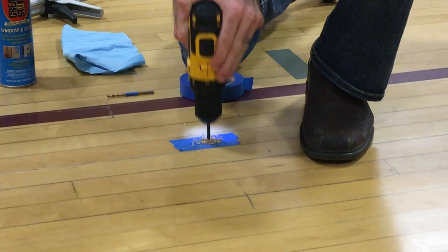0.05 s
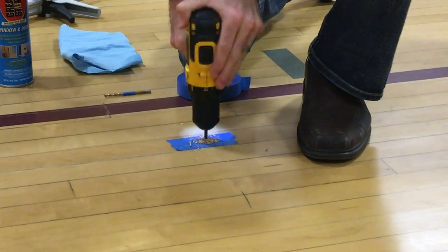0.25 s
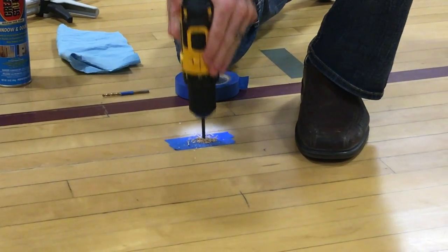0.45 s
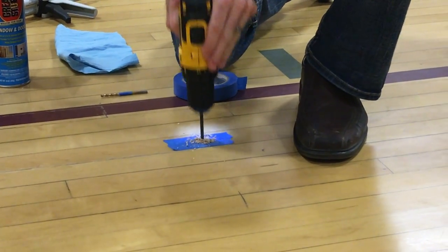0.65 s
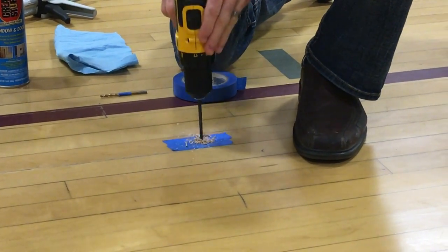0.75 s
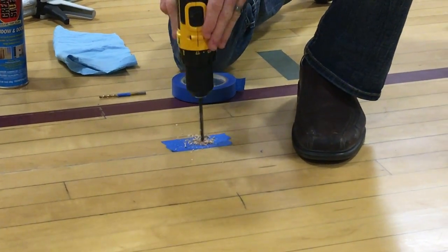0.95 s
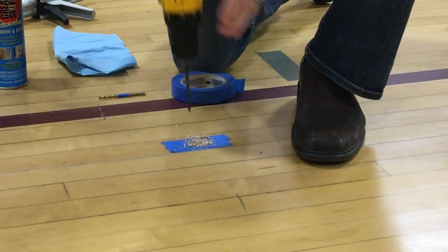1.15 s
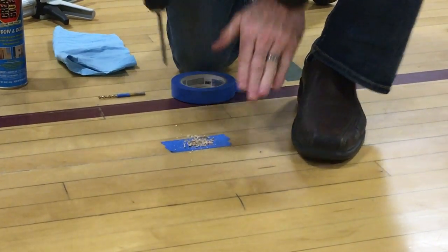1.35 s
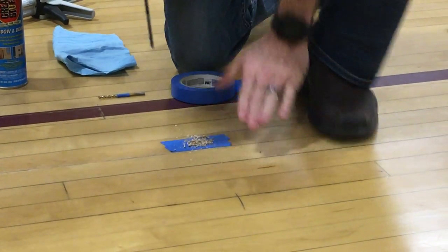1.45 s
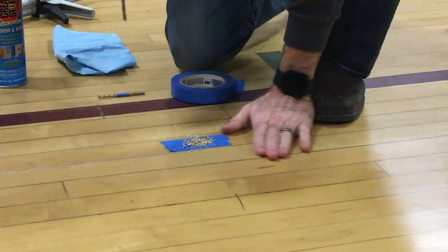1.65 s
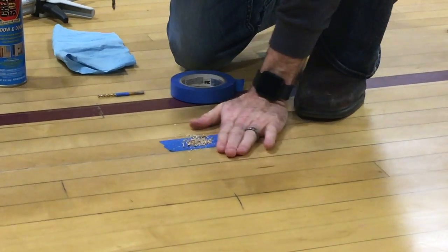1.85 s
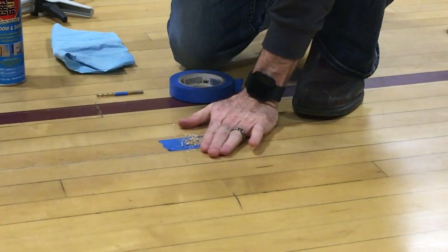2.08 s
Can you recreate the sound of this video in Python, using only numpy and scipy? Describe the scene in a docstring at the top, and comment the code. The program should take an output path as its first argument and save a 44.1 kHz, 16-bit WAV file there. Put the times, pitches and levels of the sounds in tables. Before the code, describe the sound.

A cordless drill whines into a wooden floor, then stops, followed by light clicks.

```python
"""A large hall with a sprung wooden floor; ventilation rumbles throughout. A cordless drill bores into
the boards: the motor whines and sags as the bit bites, gears rattle, the bit rasps. It is pulled out
and brakes, chuck clacking. A boot shifts with light clicks and a scuff; a hand lands on the boards
and brushes over them. The floor booms softly under shifting weight."""
import sys
import numpy as np
from scipy import signal
from scipy.fft import rfft, irfft, next_fast_len
from scipy.io import wavfile
from scipy.ndimage import map_coordinates

SR = 44100
rng = np.random.default_rng(int(sys.argv[2]) if len(sys.argv) > 2 else 0)


def persist_wave(psi):
    """Save psi, clipped to +-1, as 16-bit WAV."""
    counts = np.round(np.clip(psi, -1, 1) * 32767).astype(np.int16)
    wavfile.write(sys.argv[1], SR, np.atleast_2d(counts).T)


N = 93492
TIME_S = np.arange(N) / SR
TOP_HZ = 16000

# motor speed: time_s, speed_hz
MOTOR_SPEED = [(0, 414.5), (.07, 414.4), (.135, 410.3), (.2, 410.8), (.28, 414.5), (.355, 417),
               (.415, 410.8), (.5, 413.3), (.605, 417.5), (.685, 412), (.75, 414), (.81, 418), (.86, 411),
               (.9, 385), (.96, 150)]
# drill envelope: time_s, gain_db
DRILL_GAIN = [(0, -32), (.1, -30.5), (.27, -31.5), (.4, -30.5), (.62, -31), (.75, -31.5), (.83, -32),
              (.885, -33.5), (.905, -41.5), (.935, -49), (.96, -66), (.99, -92), (1.02, -150)]
# bite of the bit: time_s, load (about -1 running free, 1 cutting hard)
BIT_LOAD = [(0, 0.13), (.1, 0.68), (.175, 1.05), (.29, -.8), (.36, 1.26), (.41, 0.77), (.53, -0.45),
            (.66, 1.1), (.72, 0.67), (.78, -0.3), (.83, 0.49), (.88, -0.23)]
# motor and gear tones: speed_multiple, level_db, db_per_load
WHINE_ORDERS = [(2.332, -27, 2), (4.46, -19, -1), (5, -20, 0), (7, -24, 2), (9, -8.3, -2.5),
                (10.02, -11.8, -1), (12.17, -25, 0), (13.1, -23, 2), (15, -23, 2), (17.25, -22, 4),
                (18, -18, 6.5), (27, -27, 3)]
# gear and bit noise: freq_hz, density_db
RATTLE_SPECTRUM = [(150, -12), (480, -18), (700, -16), (1200, -9), (1950, -6), (2600, -11.5), (2900, -10.5),
                   (3200, -0.5), (3800, -2.5), (4500, -4.5), (4950, -11), (5450, -5.5), (6400, -6),
                   (7600, -8), (8300, -8), (9600, -10.5), (10400, -13.5), (11200, -13), (13000, -15),
                   (16000, -20)]
# housing resonances: centre_hz, width_hz, level_db, db_per_load
HOUSING_MODES = [(947.5, 49, -18.5, 3.5), (1620, 120, -22.5, -10), (1933, 120, -24.5, 5),
                 (3240, 280, -20, 7.5), (5990, 310, -22.5, 8), (7120, 200, -23, 7.5), (7320, 170, -31, 3),
                 (10100, 210, -32, 10), (11650, 190, -27, 4)]
# ventilation rumble: freq_hz, density_db
RUMBLE_SPECTRUM = [(20, -52), (28, -25), (38, -16), (46, -7), (60, 0), (82, -1), (105, -4.5), (130, -6),
                   (165, -12), (230, -12.5), (300, -20), (450, -25.5), (600, -68), (1000, -82)]
# rush of air: freq_hz, density_db
AIR_SPECTRUM = [(240, -25), (400, -6), (614, -2), (873, -9.5), (942, -8), (1200, -13), (1360, -7.5),
                (1540, -14.5), (4000, -26), (15500, -41)]
# floor booms: start_s, level_db, pitch_hz, t60_s
FLOOR_THUDS = [(0.563, -19.5, 147, 0.057), (.915, -32, 129, 0.091), (1.566, -30, 94.6, 0.18),
               (1.676, -28, 90, 0.15)]
# chuck clacks: start_s, peak_db, t60_s
CHUCK_CLACKS = [(.8727, -22, 0.0072), (.8875, -21.5, 0.044), (0.9206, -24, 0.032)]
# chuck resonances: centre_hz, width_hz, gain_db
CHUCK_MODES = [(717, 170, -3), (1790, 810, 0.5), (3150, 330, 3.5), (4100, 550, -6), (6400, 890, -13),
               (8950, 680, -5)]
# tool, boot and hand contacts: start_s, level_db, centre_hz, t60_s, ring_db
CONTACT_CLICKS = [(1.0135, -30.5, 3780, 0.017, -5), (1.048, -52, 4930, 0.015, -1),
                  (1.116, -55.5, 6940, 0.03, -38.5), (1.431, -32.5, 4330, .007, -33),
                  (1.4361, -25.5, 3820, 0.011, -10), (1.4558, -53, 5400, 0.012, -32),
                  (1.468, -48, 4600, .01, -27), (1.474, -34.5, 4750, 0.0089, -7),
                  (1.486, -34.5, 4600, 0.007, -9), (1.4926, -24.5, 3900, 0.0054, -16),
                  (1.4963, -28.5, 3140, 0.012, -15), (1.534, -31, 4080, 0.0082, -7.5),
                  (1.5552, -32.5, 1060, 0.017, -7), (1.557, -37, 5500, 0.013, -31),
                  (1.569, -32.5, 3700, 0.022, -8), (1.5932, -36.5, 3540, 0.014, -11),
                  (1.603, -34.5, 3800, 0.022, -5.5), (1.6227, -38, 4270, 0.017, -27),
                  (1.6617, -31, 4160, 0.0077, -11.5), (1.692, -51, 4500, .015, -23),
                  (1.7387, -35, 1140, 0.02, -2.5), (1.89, -44, 8150, 0.014, -29),
                  (1.985, -55, 3400, .03, 5)]
# floorboard modes: pitch_hz, level_db, t60_s
BOARD_MODES = [(666, -2, 0.028), (1015, -1, 0.028), (1147, -1, 0.03), (1370, -2, 0.018), (1750, 1.5, 0.023),
               (2300, -11, 0.03), (3580, -16, 0.019)]
# sole and palm strokes: start_s, length_s, level_db, centre_hz
FLOOR_SLIDES = [(1.471, 0.1, -60, 5000), (1.529, 0.16, -55, 4240), (1.663, .14, -78, 5500),
                (1.737, 0.23, -66.5, 4800), (1.887, 0.068, -46.5, 8160), (1.923, 0.3, -74, 5060)]
# hall decay: freq_hz, t60_s
HALL_DECAY = [(150, 0.17), (1000, 1.62), (3500, 0.59), (7000, 0.37), (15000, 0.17)]


def amp(db):
    """Decibels to gain."""
    return 10 ** (np.asarray(db) / 20)


def decay(t, t60_s):
    """Exponential fall, 60 dB in t60_s."""
    return amp(-60 * t / t60_s)


def unit_rms(x):
    """Scale to rms 1."""
    return x / np.sqrt(np.mean(x ** 2) + 1e-20)


def log_interp(rows, hz):
    """Interpolate (freq_hz, value) rows on a log axis."""
    freq_hz, values = np.transpose(rows)
    return np.interp(np.log(hz + 1), np.log(freq_hz + 1), values)


def curve(rows):
    """One value per sample from (time_s, value) rows."""
    return np.interp(TIME_S, *np.transpose(rows))


def wobble(knots_per_s):
    """Smooth random curve."""
    return map_coordinates(rng.standard_normal(8192), [TIME_S * knots_per_s], mode="wrap")


def filtered(x, response):
    """Apply a frequency response."""
    size = next_fast_len(len(x) + 8192)
    return irfft(rfft(x, size) * response(np.fft.rfftfreq(size, 1 / SR)), size)[:len(x)]


def coloured(x, spectrum):
    """Shape by a spectrum table; rms 1."""
    return unit_rms(filtered(x, lambda f: amp(log_interp(spectrum, f))))


def resonate(x, hz, width_hz):
    """One band-pass resonance."""
    return filtered(x, lambda f: 1j * f * width_hz / (hz * hz - f * f + 1j * f * width_hz))


def resonate_twice(x, hz, width_hz):
    """Two double-width resonances in series: steeper skirts."""
    return resonate(resonate(x, hz, 2 * width_hz), hz, 2 * width_hz)


def add(track, start_s, sound):
    """Mix a sound in at start_s."""
    part = track[round(start_s * SR):][:len(sound)]
    part += sound[:len(part)]


def drill(jitter_hz=0.6, flutter_db=1.8, pulse_depth=0.56, chips_per_s=790):
    """Whine locked to the motor, gears pulsing once a turn, cracking chips, housing rung by the bit."""
    load = curve(BIT_LOAD)
    speed_hz = curve(MOTOR_SPEED) + jitter_hz * wobble(148.7)
    angle_rad = 2 * np.pi * np.cumsum(speed_hz) / SR
    whine = np.zeros(N)
    for multiple, level_db, db_per_load in WHINE_ORDERS:
        tone_rms = amp(level_db + db_per_load * load + flutter_db * wobble(70))
        whine += tone_rms * np.sqrt(2) * np.sin(multiple * angle_rad)
    gears = unit_rms(rng.standard_normal(N) * (1 + pulse_depth * np.cos(angle_rad)))
    chip_hits = (rng.random(N) < chips_per_s / SR) * rng.choice([-1, 1], N)
    chips = unit_rms(chip_hits * amp(rng.normal(0, 0.5, N)))
    rattle = amp(-1) * coloured(gears + amp(-13.5) * chips, RATTLE_SPECTRUM)
    housing = np.zeros(N)
    for hz, width_hz, level_db, db_per_load in HOUSING_MODES:
        mode = unit_rms(resonate_twice(rng.standard_normal(N), hz, width_hz))
        housing += amp(level_db + db_per_load * load) * mode
    return amp(curve(DRILL_GAIN)) * (whine + rattle + housing)


def ventilation(rumble_db=-41.5, air_db=-59.5):
    """Steady low rumble and a faint rush of air."""
    rumble = coloured(rng.standard_normal(N), RUMBLE_SPECTRUM)
    air = coloured(rng.standard_normal(N), AIR_SPECTRUM)
    return amp(rumble_db) * rumble + amp(air_db) * air


def floor_thuds(rise_s=0.0077):
    """The sprung floor booms as weight shifts on it."""
    out = np.zeros(N)
    attack = 1 - np.exp(-TIME_S / rise_s)
    for start_s, level_db, pitch_hz, t60_s in FLOOR_THUDS:
        envelope = amp(level_db) * attack * decay(TIME_S, t60_s)
        add(out, start_s, envelope * np.sin(2 * np.pi * pitch_hz * TIME_S))
    return out


def chuck_clacks():
    """The loose chuck chatters through its resonances as the drill pulls out and brakes."""
    out, t = np.zeros(N), TIME_S[:SR // 8]
    for start_s, peak_db, t60_s in CHUCK_CLACKS:
        chatter = rng.standard_normal(len(t)) * decay(t, t60_s)
        ring = sum(amp(db) * resonate_twice(chatter, hz, width_hz) for hz, width_hz, db in CHUCK_MODES)
        add(out, start_s, amp(peak_db) * ring / abs(ring).max())
    return out


def board_ring(t, spread_db=2.5, detune=0.015):
    """Damped floorboard modes, slightly different at each hit."""
    ring = np.zeros(len(t))
    for pitch_hz, level_db, t60_s in BOARD_MODES:
        envelope = amp(level_db + rng.normal(0, spread_db)) * decay(t, t60_s)
        hz = pitch_hz * (1 + detune * rng.normal())
        ring += envelope * np.sin(2 * np.pi * hz * t)
    return ring


def contact_clicks(attack_s=0.0001, body_q=2.8, crack_db=-9, crack_t60_s=0.0015):
    """Tool, boot and hand tap: a resonant burst, a broad crack and ringing boards."""
    out, t = np.zeros(N), TIME_S[:SR // 8]
    attack = 1 - np.exp(-t / attack_s)
    for start_s, level_db, centre_hz, t60_s, ring_db in CONTACT_CLICKS:
        lowpass = signal.butter(2, min(2.33 * centre_hz, TOP_HZ), fs=SR, output="sos")
        burst = signal.sosfilt(lowpass, rng.standard_normal(len(t)) * attack * decay(t, t60_s))
        body = resonate(burst, centre_hz, centre_hz / body_q)
        crack = resonate(burst * decay(t, crack_t60_s), 3 * centre_hz, 6 * centre_hz)
        ring = amp(ring_db - 6) * board_ring(t)
        click = body / abs(body).max() + amp(crack_db) * crack / abs(crack).max() + ring
        add(out, start_s, amp(level_db) * click)
    return out


def floor_slides(rise_s=0.004, fall_s=0.093, grain_db=3, grit_per_s=870, grit_db=-10):
    """Sole and palm rub on dusty varnish: grainy friction and crunching sawdust."""
    out = np.zeros(N)
    for start_s, length_s, level_db, centre_hz in FLOOR_SLIDES:
        fade_in = np.clip((TIME_S - start_s) / rise_s, 0, 1)
        fade_out = np.clip((start_s + length_s - TIME_S) / fall_s, 0, 1)
        friction = rng.standard_normal(N) * amp(grain_db * wobble(400))
        grit = unit_rms((rng.random(N) < grit_per_s / SR) * rng.standard_normal(N))
        scuff = resonate(friction + amp(grit_db) * grit, centre_hz, width_hz=centre_hz)
        out += amp(level_db) * fade_in * fade_out * unit_rms(scuff)
    return out


def hall_reverb(x, near_db, near_t60_s=0.051, tail_db=-18.5):
    """Near reflections and a tail that lasts longest in the midrange."""
    hz, t, spectrum = signal.stft(rng.standard_normal(N), SR, nperseg=256)
    t60_s = log_interp(HALL_DECAY, hz)[:, None]
    tail = signal.istft(spectrum * decay(t, t60_s), SR, nperseg=256)[1]
    near = rng.standard_normal(len(tail)) * decay(np.arange(len(tail)) / SR, near_t60_s)
    response = amp(tail_db) * tail / np.linalg.norm(tail) + amp(near_db) * near / np.linalg.norm(near)
    return signal.fftconvolve(x, response)[:N]


def scene():
    """Drill and floor sounds in the hall, over ventilation; both channels alike."""
    tool = drill() + chuck_clacks()
    floor = floor_thuds() + contact_clicks() + floor_slides()
    reverb = hall_reverb(tool, near_db=-25) + hall_reverb(floor, near_db=-15)
    return np.tile(tool + floor + reverb + ventilation(), (2, 1))


def record(dry):
    """Brick-wall low-pass at TOP_HZ."""
    return np.array([filtered(channel, lambda f: f < TOP_HZ) for channel in dry])


dry = scene()
out = record(dry)
persist_wave(out)
```